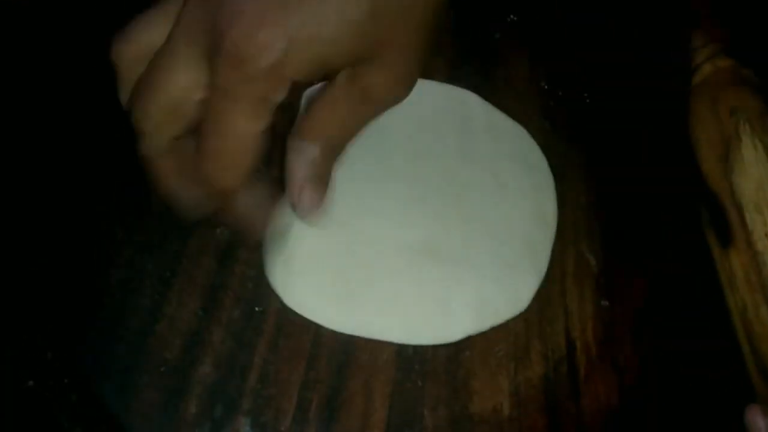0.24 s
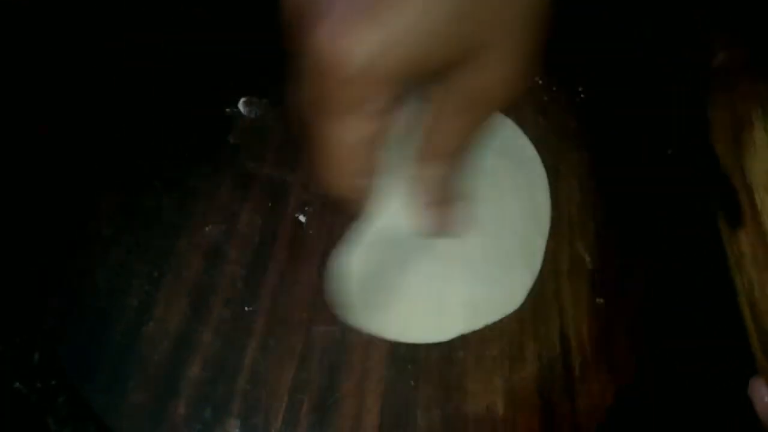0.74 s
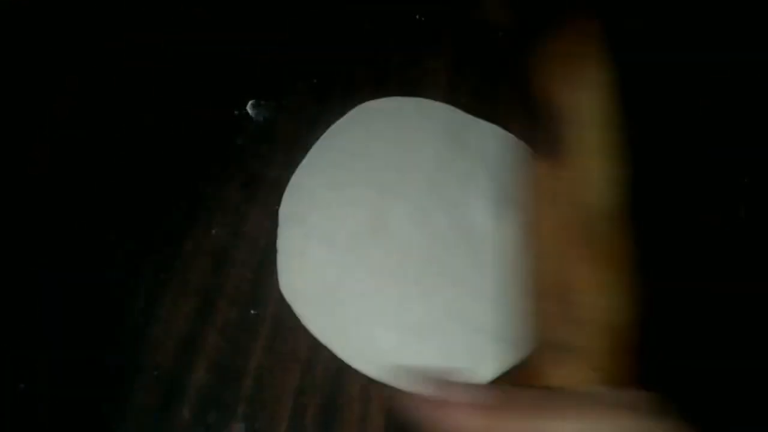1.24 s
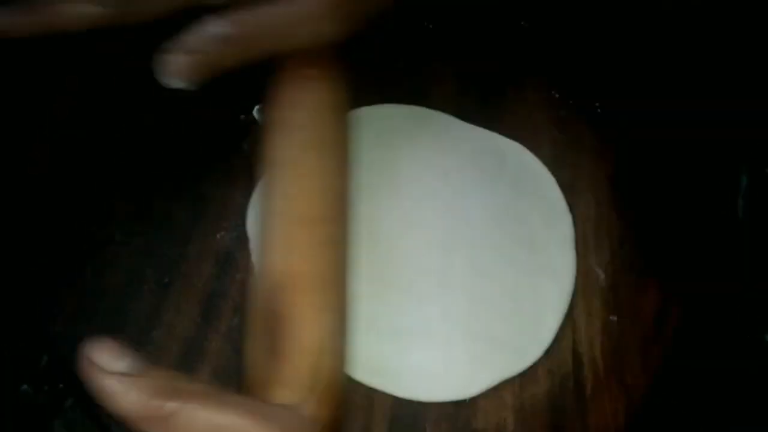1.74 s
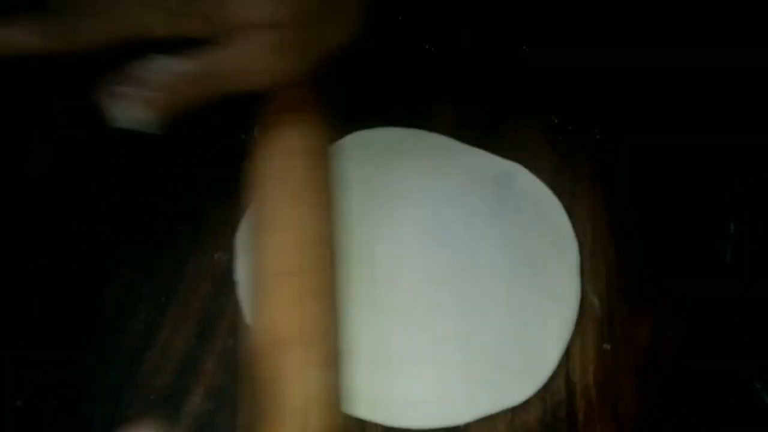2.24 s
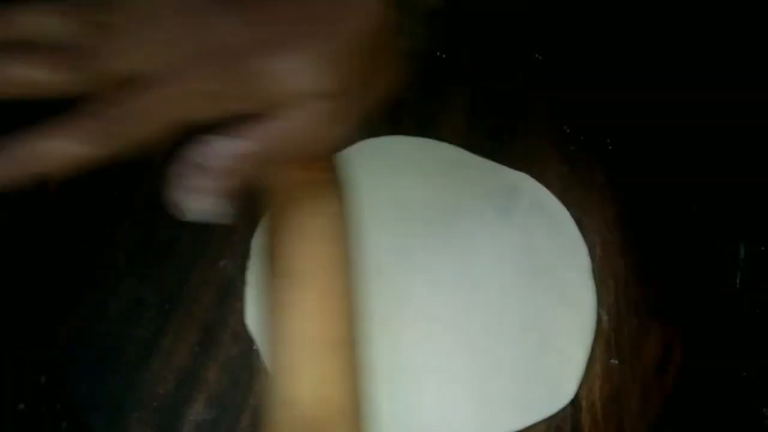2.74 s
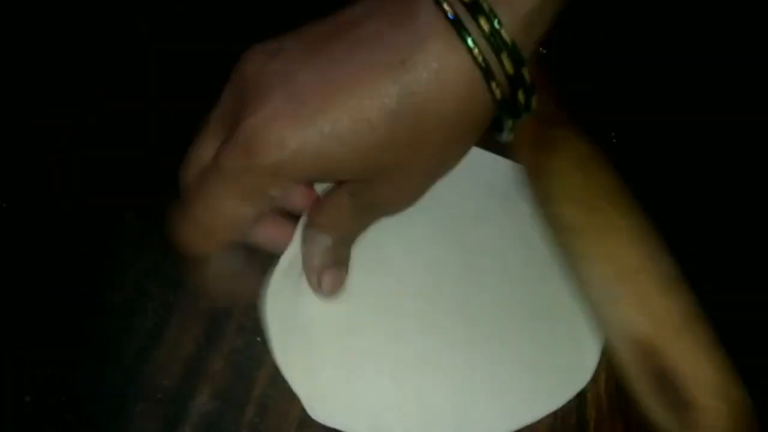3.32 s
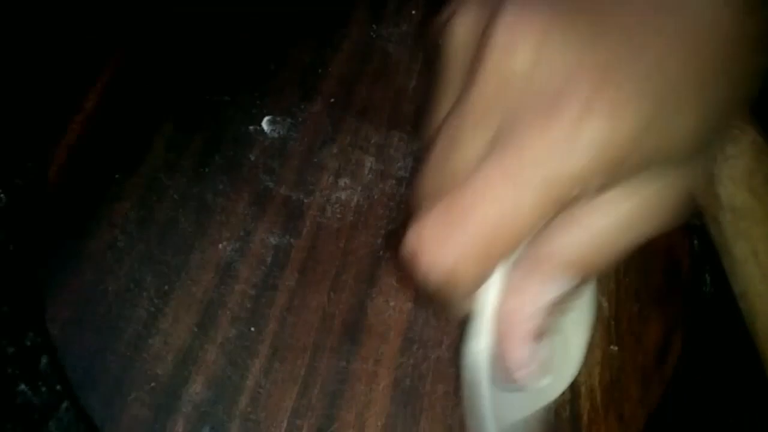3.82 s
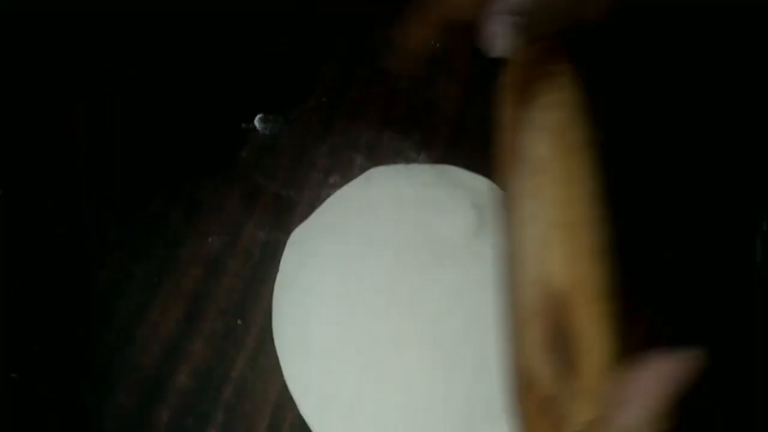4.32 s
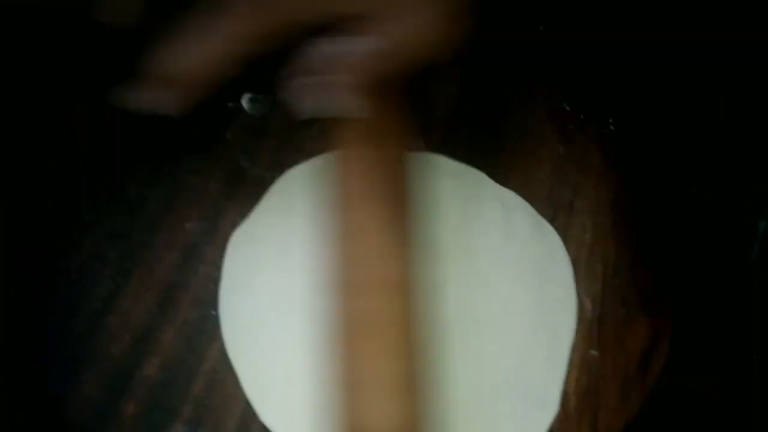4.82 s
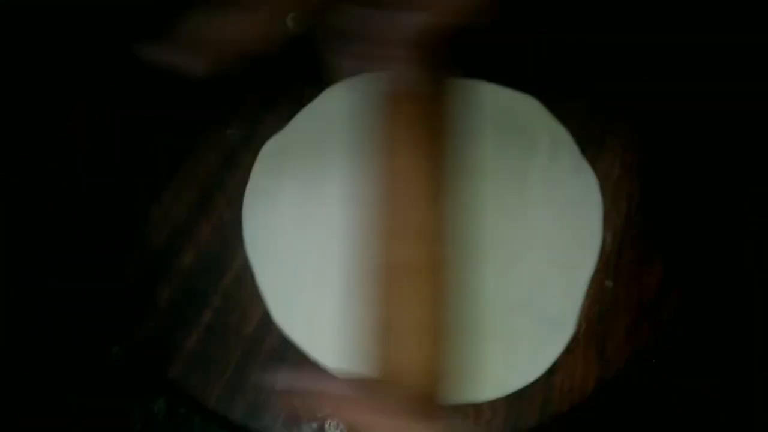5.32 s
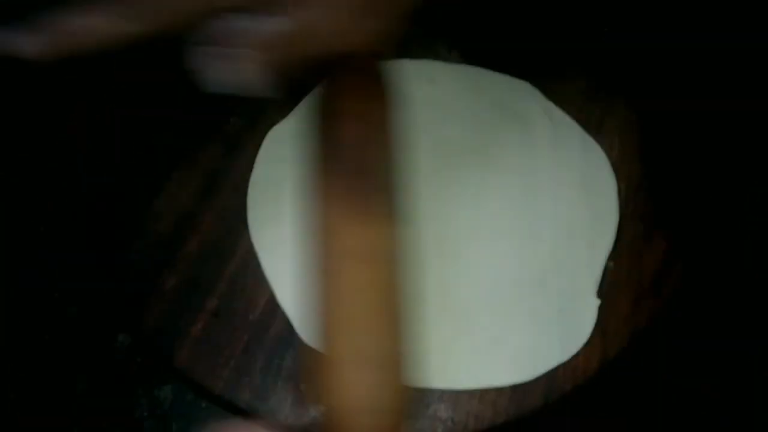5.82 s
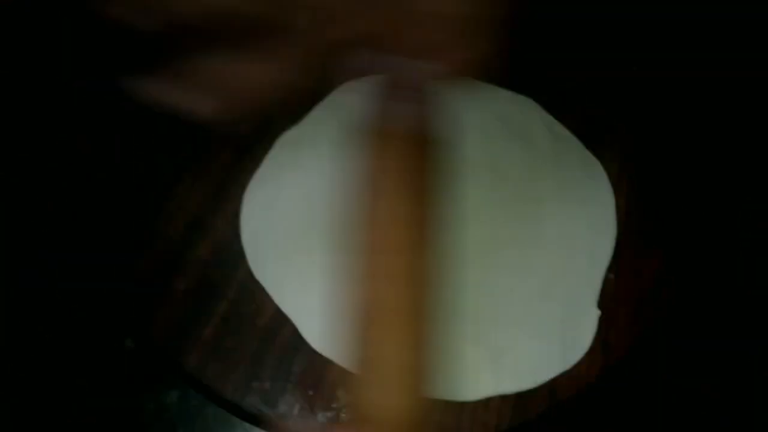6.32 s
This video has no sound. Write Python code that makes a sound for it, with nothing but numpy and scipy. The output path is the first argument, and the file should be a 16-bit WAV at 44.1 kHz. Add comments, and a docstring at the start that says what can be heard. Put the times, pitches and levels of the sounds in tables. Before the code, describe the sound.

A wooden board clacks sharply and irregularly on a counter while dough is rolled, with flat dough slaps and faint rubbing in a small kitchen.

```python
"""A wooden board tips and clacks on a counter while dough is rolled: decaying modes plus a noise crack,
hard knocks hop twice. A rolling pin drops, hands thud and pick, and the dough is slapped down twice, popping
trapped air. Dough drags and strokes hiss as shaped noise; a bangle clinks, a thin tick and a faint squeal
sound, and a low hum comes and goes over quiet noise. Sparse decaying reflections make a hard, small kitchen."""
import sys
import numpy as np
from scipy import signal
from scipy.fft import rfft, irfft
from scipy.io import wavfile
from scipy.ndimage import uniform_filter1d, minimum_filter1d

SR = 44100
rng = np.random.default_rng(int(sys.argv[2]) if len(sys.argv) > 2 else 0)


def generate_wav(signal):
    """Clip the signal to [-1, 1] and save it as 16-bit WAV at the path in sys.argv[1]."""
    frames = np.transpose(np.atleast_2d(signal))
    scaled = np.clip(frames, -1, 1) * 32767
    pcm = np.round(scaled).astype(np.int16)
    wavfile.write(sys.argv[1], SR, pcm)


N = 289296
TIME = np.arange(N) / SR  # s


BOUNCE_ABOVE_DB = -11
HOP_S, HOP_SHRINK = 0.0085, 0.88  # first hop, ratio of each next hop
HOP_LOSS_DB, HOP_BRIGHT_DB = 5.5, -6  # loss grows with hop number; treble offset


def with_bounces(rows, count=2):
    """After a hard knock the board hops and lands again, each time sooner, weaker and duller."""
    contacts = []
    for s, db, bright_db in rows:
        contacts.append((s, db, bright_db))
        if db > BOUNCE_ABOVE_DB:
            for k in range(count):
                s = s + HOP_S * HOP_SHRINK ** k
                hop_db = db - HOP_LOSS_DB * (k + 1) ** 1.3
                contacts.append((s, hop_db, bright_db + HOP_BRIGHT_DB))
    return contacts


LEAN_FROM_S, LEAN_DB, LEAN_HZ = 4.4, -2.5, 277


def leaned_on(board):
    """Once the dough is turned, hands lean on the board and trim its bass."""
    damped = causal(board, lambda hz: LEAN_DB / (1 + (hz / LEAN_HZ) ** 6))
    return np.where(TIME < LEAN_FROM_S, board, damped)


# Board tipping onto the counter. Each row: start in seconds, level in dB, brightness in dB.
BOARD_KNOCKS = [(2.417, -22, -24), (2.43, -24, -19), (2.442, -16, -19.5), (2.486, -29.5, -49.5),
                (2.5135, 2, -1.5), (2.763, -24, -37), (2.787, -23, -29), (2.986, -35, -33),
                (3.007, -32, -62), (3.031, -19, -13), (3.06, -7, -5.5), (5.318, -36.5, -42),
                (5.439, -32, -42), (5.4562, -5, -4), (5.757, -29.5, -65), (5.804, -34, -66),
                (5.988, -41, -39), (6.0138, -11.5, -6.5), (6.232, -32, -9), (6.244, -18, -19.5),
                (6.284, -23, -23), (6.398, -31, -54), (6.4708, -7, -4)]
# Board modes. Each row: frequency in Hz, level in dB, t60 in seconds.
BOARD_MODES = [(122, -30.5, 0.46), (149, -33.5, 0.44), (230.7, -38, 1), (318, -18.5, 0.086),
               (416, -18.5, 0.024), (704.5, 0, 0.029), (806.4, 4.5, 0.031), (1017, -13.5, 0.041),
               (1302.6, -9.5, 0.1), (1384, -3.5, 0.027), (1572, -7.5, 0.05), (1918, -8.5, 0.056),
               (2230, -9, 0.016), (2580, -10, 0.032), (3158, -6, 0.05), (3310, -10, 0.045),
               (3860, -12.5, 0.04), (4460, -13.5, 0.05)]
# Faint lingering modes of board and counter. Each row: frequency in Hz, level in dB.
LINGERING_MODES = [(425, -30), (705, -29), (786, -24.5), (1394, -22), (2309, -27)]
LINGER_T60_S = 0.43
# Crack spectrum of wood contacts. Each row: frequency in Hz, level in dB.
WOOD_CRACK_COLOUR = [(100, -35), (350, -13), (550, -8), (800, 5), (1500, 0), (3400, -2), (4500, -2.5),
                     (5100, -16), (5700, -17.5), (7000, -29), (10000, -44), (15000, -62)]
# Peaks and dips of the wood's echo. Each row: frequency in Hz, width in Hz, gain in dB.
WOOD_ECHO_PEAKS = [(1130, 67, -7.5), (1330, 93, 1.5), (2630, 440, 8), (2910, 180, -9.5), (4350, 200, -6)]


def board_knocks():
    """Board impacts excite damped and lingering modes; hard ones rebound."""
    modes = BOARD_MODES + [(hz, db, LINGER_T60_S) for hz, db in LINGERING_MODES]
    knocks = strikes(with_bounces(BOARD_KNOCKS), modes, WOOD_CRACK_COLOUR, db=-11.0, crack_db=1.5,
                     crack_t60_s=0.05, rise_s=0.00037, soft_hz=1510, room_db=6.5, peaks=WOOD_ECHO_PEAKS)
    return leaned_on(knocks)


# Pin dropping off the board edge and settling. Each row: start in seconds, level in dB, brightness in dB.
ROLLING_PIN_DROPS = [(3.298, -22.5, -1), (3.316, -24.5, -10), (3.645, -48.5, -29.5), (3.681, -35, -56)]
# Pin modes. Each row: frequency in Hz, level in dB, t60 in seconds.
PIN_MODES = [(322.6, -6.5, 0.14), (730, 5, 0.033), (896, 1.5, 0.015), (1320, -2.5, 0.022),
             (1773, 6.5, 0.042), (2220, 3, 0.02), (2590, 15.5, 0.03), (3460, 7.5, 0.019)]


def pin_drops():
    """The pin's short wooden modes ring with an abrupt crack."""
    return strikes(ROLLING_PIN_DROPS, PIN_MODES, WOOD_CRACK_COLOUR, db=-8, crack_db=-6,
                   crack_t60_s=0.067, rise_s=0.0001, soft_hz=1340, room_db=9.5)


# Dough sheet on the board. Each row: start in seconds, level in dB, brightness in dB, trapped-air pitch in Hz.
DOUGH_SLAPS = [(1.156, -31.5, -15, 1280), (1.1639, -26.5, -4, 730), (1.178, -51, -18, 2840),
               (1.2079, -26.5, -5.5, 2300), (4.18, -48, -8.5, 1620), (4.197, -20.5, -5.5, 1960),
               (4.203, -19.5, -9, 1457), (4.217, -29, -5, 1264)]
# Smack spectrum. Each row: frequency in Hz, level in dB.
SLAP_COLOUR = [(100, -32), (330, -0.5), (550, -4.5), (1400, 6.5), (2400, 11.5), (4500, 9.5), (5600, -3),
               (9000, -17), (14000, -38)]
POCKET_T60_S = 0.032


def dough_slaps():
    """Each part of the sheet lands with a smack and pops the air pocket under it."""
    out = np.zeros(N)
    for s, db, bright_db, pocket_hz in DOUGH_SLAPS:
        pocket = [(pocket_hz, 0, POCKET_T60_S)]
        out += strikes([(s, db, bright_db)], pocket, SLAP_COLOUR, db=-13.0, crack_db=7,
                       crack_t60_s=0.053, rise_s=0.00049, soft_hz=1270, room_db=8)
    return out


# Ring after a slap. Each row: start in seconds, level in dB, first Hz, Hz approached, noise width in Hz.
SLAP_RING_GLIDES = [(1.215, -53, 2600, 2347, 190), (4.199, -47.5, 1938, 1195, 430)]


def slap_rings(glide_s, t60_s):
    """A noise-modulated resonance sinks in pitch as it fades."""
    out, t = np.zeros(N), np.arange(SR // 2) / SR
    for s, db, first_hz, last_hz, width_hz in SLAP_RING_GLIDES:
        hz = last_hz + (first_hz - last_hz) * np.exp(-t / glide_s)
        carrier = np.sin(2 * np.pi * np.cumsum(hz) / SR)
        ring = unit(wander(width_hz)[:len(t)] * carrier)
        add(out, s, amp(db - 60 * t / t60_s) * ring)
    return out


# Hands and pin on dough. Each row: start in seconds, level in dB, brightness in dB.
DOUGH_THUDS = [(0.944, -56, -59), (1.495, -47, -19), (1.835, -52.5, -15), (4.554, -33.5, -28.5),
               (4.711, -51, -68), (5.137, -51.5, -2)]
# Board modes damped by hand and dough. Each row: frequency in Hz, level in dB, t60 in seconds.
DAMPED_MODES = [(128, -2, 0.089), (470, -13.5, 0.013), (726, -0.5, 0.088), (960, -1.5, 0.049),
                (1350, -6.5, 0.093)]
# Pat spectrum. Each row: frequency in Hz, level in dB.
PAT_COLOUR = [(80, -15), (300, 1), (1200, -10.5), (2500, -3.5), (4500, -4), (7000, -20.5), (14000, -49)]


def dough_thuds():
    """Soft contacts drive the damped board modes."""
    return strikes(DOUGH_THUDS, DAMPED_MODES, PAT_COLOUR, db=-6.5, crack_db=8,
                   crack_t60_s=0.023, rise_s=0.00061, soft_hz=1458, room_db=4.0)


# Dough sliding on the board. Each row: start in seconds, length in seconds, level in dB.
DOUGH_PEEL = [(0, 0.45, -51), (.44, 0.24, -55), (.755, 0.11, -57), (.925, 0.027, -54), (1.025, 0.028, -55),
              (1.13, 0.22, -63.5)]
PEEL_RISE_S, PEEL_FADE_DB_PER_S = 0.016, 172
# Slide spectrum. Each row: frequency in Hz, level in dB.
SLIDE_COLOUR = [(40, -32), (130, 4.5), (200, -4), (280, 8), (360, -1), (440, 7.5), (580, -19),
                (1000, -19.5), (3000, -28), (6000, -83)]
# Hand and pin over floured dough. Each row: start in seconds, length in seconds, level in dB.
FLOUR_STROKES = [(.04, 0.44, -65), (1.64, 0.36, -64.5), (2.17, 0.11, -66.5), (3.86, 0.29, -67),
                 (4.5, 0.15, -69), (5.22, 0.23, -69.5)]
STROKE_RISE_S, STROKE_FADE_DB_PER_S = 0.074, 89
# Soft stroke hiss. Each row: frequency in Hz, level in dB.
STROKE_COLOUR = [(500, -1.5), (1500, -1.5), (2600, 1), (3500, 4.5), (4700, 9), (5600, -2.5), (8000, -10.5),
                 (14000, -13)]


def rubbing():
    """Dough drags in uneven slips; hands and pin hiss over flour: noise of wandering level."""
    slips = unit(noise(SLIDE_COLOUR) * amp(2.7 * wander(47)))
    drag = envelope(DOUGH_PEEL, PEEL_RISE_S, PEEL_FADE_DB_PER_S) * slips
    hiss = unit(noise(STROKE_COLOUR) * amp(1.9 * wander(60)))
    roll = envelope(FLOUR_STROKES, STROKE_RISE_S, STROKE_FADE_DB_PER_S) * hiss
    return amp(-4.5) * drag + amp(-6.5) * roll


# Fingers picking at dough. Each row: start in seconds, level in dB, brightness in dB.
FINGER_PICKS = [(0.077, -43.5, -30), (0.1, -46, -10), (0.378, -43.5, -12), (0.63, -51.5, 0),
                (0.683, -44, -14)]
# Scuff spectrum. Each row: frequency in Hz, level in dB.
SCUFF_COLOUR = [(200, -44), (730, 4), (1030, 11), (1300, 1), (1600, -8.5), (4500, -0.5), (14000, -45)]


def finger_picks():
    """Fingers scuff with slow-rising noise and no modes."""
    return strikes(FINGER_PICKS, [], SCUFF_COLOUR, db=-13.5, crack_db=0,
                   crack_t60_s=0.064, rise_s=0.01, soft_hz=1510, room_db=12.5)


# Bangle contacts. Each row: start in seconds, level in dB, brightness in dB.
BANGLE_CLINKS = [(1.8625, -40.5, -19), (4.764, -30.5, -8.5), (5.2565, -32.5, -8.5), (5.302, -39, -20)]
# Bangle modes. Each row: frequency in Hz, level in dB, t60 in seconds.
BANGLE_MODES = [(1041, -19, 0.083), (1810, -12.5, 0.047), (3320, -3, 0.072), (3520, -7, 0.0094),
                (6300, -15.5, 0.027), (9950, -22.5, 0.047)]
# Clink spectrum. Each row: frequency in Hz, level in dB.
CLINK_COLOUR = [(300, -19), (1200, -10.5), (2500, -4.5), (3400, 14), (5200, -3.5), (6400, -7.5),
                (8000, -22), (14000, -41)]


def bangle_clinks():
    """The struck bangle rings in short modes under a bright crack."""
    return strikes(BANGLE_CLINKS, BANGLE_MODES, CLINK_COLOUR, db=-12.0, crack_db=4,
                   crack_t60_s=0.1, rise_s=0.00045, soft_hz=1470, room_db=10)


# Thin tick as the pin turns back. Each row: start in seconds, length in seconds, level in dB.
HIGH_TICKS = [(6.237, 0.02, -73.5)]


def tick(hz, width_hz, fade_db_per_s):
    """Fast pitch wander turns a very high tone into a short sizzle."""
    return envelope(HIGH_TICKS, 0.002, fade_db_per_s) * tone(hz, waver_hz=width_hz, rate_hz=width_hz)


# Squeal in four pushes. Each row: start in seconds, length in seconds, lower tone in dB, upper tone in dB.
SQUEAL_PUSHES = [(.118, 0.12, -68, -62), (.222, 0.093, -51.5, -55.5), (.365, 0.029, -55.5, -62),
                 (.477, 0.115, -61, -76)]
SQUEAL_HZ = (3637, 4884)
SQUEAL_RISE_S, SQUEAL_FADE_DB_PER_S = 0.018, 300


def squeal(rough_db, room_db):
    """Two rough friction tones and a faint octave; the room rings on after each push."""
    low_hz, high_hz = SQUEAL_HZ
    out = np.zeros(N)
    for hz, column, db in ((low_hz, 2, 0), (high_hz, 3, 0), (2 * low_hz, 2, -31)):
        voice = unit(tone(hz, waver_hz=22, rate_hz=90) * amp(rough_db * wander(90)))
        gain = envelope(SQUEAL_PUSHES, SQUEAL_RISE_S, SQUEAL_FADE_DB_PER_S, column)
        out += amp(db) * gain * voice
    return out + amp(room_db) * signal.fftconvolve(out, kitchen())[:N]


# Low hum and its three swells. Each row: start in seconds, length in seconds, level in dB.
HUM_SWELLS = [(1.08, 1.2, -63), (1.49, 0.065, -57), (1.76, 0.38, -63), (2.17, 0.025, -58.5)]
HUM_HZ, HUM_RISE_S, HUM_FADE_DB_PER_S = 125.3, 0.036, 98
# Quiet kitchen spectrum. Each row: frequency in Hz, level in dB.
FLOOR_COLOUR = [(20, -18), (45, -3), (68, 8.5), (85, 0.5), (110, 10.5), (170, 1), (300, -1), (700, -12),
                (4500, -14), (7000, -21), (15000, -22)]
FLOOR_DB = -67.5


def background():
    """A slightly wavering low sine over the kitchen's steady noise."""
    hum = envelope(HUM_SWELLS, HUM_RISE_S, HUM_FADE_DB_PER_S) * tone(HUM_HZ, waver_hz=0.69, rate_hz=25)
    return hum + amp(FLOOR_DB) * noise(FLOOR_COLOUR)


# Echo spectrum. Each row: frequency in Hz, level in dB.
ROOM_COLOUR = [(100, -0.5), (230, 5.5), (335, 5.5), (520, -1), (750, -6), (1100, -4), (1800, -3), (2700, 2),
               (4500, 0), (12000, 6.5)]
# Echo decay. Each row: frequency in Hz, t60 in seconds.
ROOM_DECAY = [(100, 2), (300, 0.49), (800, 0.76), (2600, 0.71), (4500, 0.67), (9000, 0.4)]


def kitchen(peaks=()):
    """Sparse random reflections die band by band, coloured by the source's peaks and dips."""
    taps = rng.choice([-1., 1.], SR) * (rng.random(SR) < 6000 / SR)  # 6000 reflections/s
    hz, t, bands = signal.stft(taps / np.linalg.norm(taps), SR, nperseg=1024)
    peaks_db = sum(db / (1 + (2 * (hz - f) / width) ** 2) for f, width, db in peaks)
    colour_db = read(ROOM_COLOUR, hz) + peaks_db
    decay = amp(-60 * t / read(ROOM_DECAY, hz)[:, None])
    tail = signal.istft(bands * amp(colour_db)[:, None] * decay, SR, nperseg=1024)[1][:SR]
    t = np.arange(SR) / SR
    onset = 1 - np.exp(-(t / 0.0071) ** 2)
    near_walls = 1 + 1.1 * np.exp(-t / 0.02)
    return tail * onset * near_walls


def blow(modes, colour, bright_db, crack_db, crack_t60_s, rise_s, soft_hz):
    """One contact: ringing modes and a dense crack; a softer contact loses treble."""
    t = np.arange(SR // 2) / SR
    swell = 1 - np.exp(-t / rise_s)
    grains = rng.choice([-1., 1.], len(t)) * swell * amp(-60 * t / crack_t60_s)
    crack = causal(grains, lambda hz: read(colour, hz))
    sound = amp(crack_db + 0.34 * bright_db) * crack / attack_rms(crack)  # gentle touch hardly cracks
    if modes:
        ring = np.zeros(len(t))
        for k, (hz, db, t60_s) in enumerate(modes):
            # spot struck and hand pressure shift each mode
            hz = hz * (1 + 0.0018 * rng.standard_normal())
            db = db + 2.4 * rng.standard_normal()
            ring += (-1) ** k * amp(db - 60 * t / t60_s) * np.sin(2 * np.pi * hz * t)
        sound = sound + ring / attack_rms(ring)
    return causal(sound, lambda hz: bright_db * np.minimum(np.log1p((hz / soft_hz) ** 2) / 1.97, 1.3))


def strikes(rows, modes, colour, db, crack_db, crack_t60_s, rise_s, soft_hz, room_db, peaks=()):
    """Blows on one object; each lands on another spot, so part of its echo is its own."""
    out, shared_echo = np.zeros(N), kitchen(peaks)
    for s, blow_db, bright_db in rows:
        sound = blow(modes, colour, bright_db, crack_db, crack_t60_s, rise_s, soft_hz)
        sound = amp(db + blow_db) * sound / attack_rms(sound)
        add(out, s, sound)
        echo = (shared_echo + 2 * kitchen(peaks)) / np.sqrt(5)
        add(out, s, amp(room_db) * signal.fftconvolve(sound, echo))
    # small objects radiate no deep bass
    return signal.sosfilt(signal.butter(5, 100, "high", fs=SR, output="sos"), out)


def attack_rms(x):
    """Strength of the first 6 ms."""
    return np.sqrt(np.mean(x[:round(0.006 * SR)] ** 2) + 1e-20)


def envelope(rows, rise_s, fade_db_per_s, column=2):
    """Gain over time: rows rise, hold for their length and fade; overlaps add in power."""
    power = np.zeros(N)
    for row in rows:
        age_s = TIME - row[0]
        fade_db = fade_db_per_s * np.maximum(age_s - row[1], 0)
        power += (np.clip(age_s / rise_s, 0, 1) * amp(row[column] - fade_db)) ** 2
    return np.sqrt(power)


def tone(hz, waver_hz, rate_hz):
    """A sine of rms 1 whose pitch wavers."""
    return np.sqrt(2) * np.sin(2 * np.pi * np.cumsum(hz + waver_hz * wander(rate_hz)) / SR)


def wander(hz):
    """Random motion with a Gaussian spectral roll-off at the given rate, rms 1."""
    rolloff = np.exp(-(np.fft.rfftfreq(N, 1 / SR) / hz) ** 2)
    return unit(irfft(rfft(rng.standard_normal(N)) * rolloff, N))


def noise(colour, size=N):
    """Noise with the given spectrum, rms 1."""
    gain = amp(read(colour, np.fft.rfftfreq(size, 1 / SR)))
    return unit(irfft(rfft(rng.standard_normal(size)) * gain, size))


def causal(x, gain_db, size=2048):
    """Minimum-phase filter whose gain in dB is a function of frequency."""
    log_gain = np.log(amp(gain_db(abs(np.fft.fftfreq(size, 1 / SR)))))
    taps = np.fft.ifft(np.exp(np.conj(signal.hilbert(log_gain)))).real
    return signal.fftconvolve(x, taps[:size // 2])[:len(x)]


def read(points, hz):
    """Interpolates a spectrum table on a log-frequency axis."""
    f, value = np.transpose(points)
    return np.interp(np.log(hz + 1), np.log(f), value)


def add(mix, s, sound):
    """Mixes a sound in at time s."""
    part = mix[max(round(s * SR), 0):][:len(sound)]
    part += sound[:len(part)]


def amp(db):
    """Decibels to gain."""
    return 10 ** (np.asarray(db) / 20)


def unit(x):
    """Scales to rms 1."""
    return x / np.sqrt(np.mean(x ** 2) + 1e-20)


def scene():
    """All sources at one microphone."""
    wood = board_knocks() + pin_drops()
    dough = dough_slaps() + slap_rings(glide_s=0.26, t60_s=0.67) + dough_thuds() + rubbing()
    small = finger_picks() + bangle_clinks() + tick(hz=9200, width_hz=650, fade_db_per_s=123)
    small += squeal(rough_db=3.0, room_db=8.5)
    return (wood + dough + small + background())[None]


def suppress(x, threshold_db, knee_db, depth_db):
    """A noise suppressor turns the sound down when its short-term power falls under a threshold."""
    power_db = 10 * np.log10(abs(uniform_filter1d(x ** 2, size=2200)) + 1e-12)
    closed = 0.5 - 0.5 * np.tanh((power_db - threshold_db) / knee_db)
    return x * amp(-depth_db * uniform_filter1d(closed, size=600))


def limit(x, ceiling):
    """A quick limiter turns the hardest peaks down smoothly."""
    needed = ceiling / np.maximum(abs(x), ceiling)
    return x * uniform_filter1d(minimum_filter1d(needed, size=200), size=200)


HISS_DB, EDGE_HZ = -90.5, 15600


def record(dry):
    """Noise suppression, electronic hiss, limiter and band limit."""
    wet = suppress(dry, threshold_db=-62.5, knee_db=2.5, depth_db=8.5)
    wet = wet + amp(HISS_DB) * rng.standard_normal(N)
    wet = limit(wet, ceiling=0.82)
    lowpass = signal.firwin(511, EDGE_HZ, window=("kaiser", 9), fs=SR)
    return signal.oaconvolve(wet, lowpass[None], "same")


dry = scene()
out = record(dry)
generate_wav(out)
```